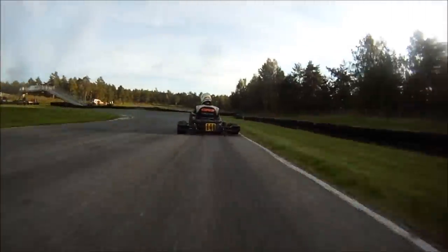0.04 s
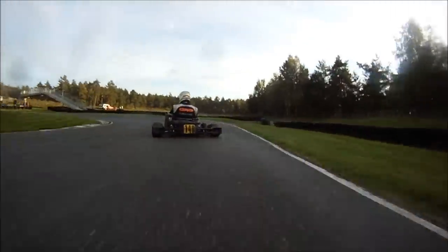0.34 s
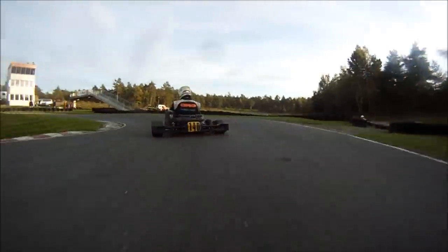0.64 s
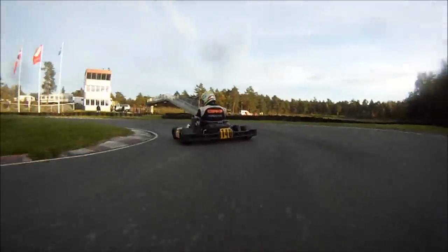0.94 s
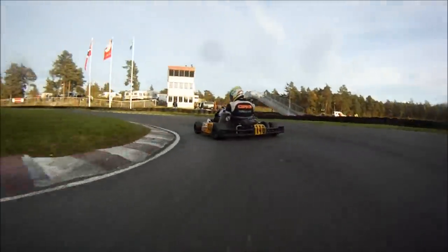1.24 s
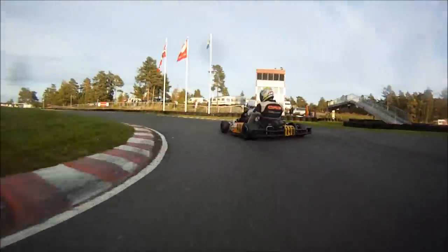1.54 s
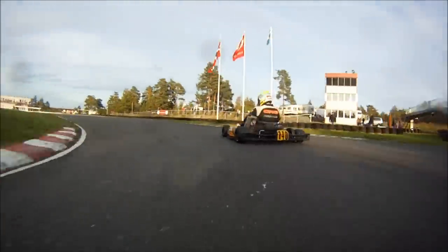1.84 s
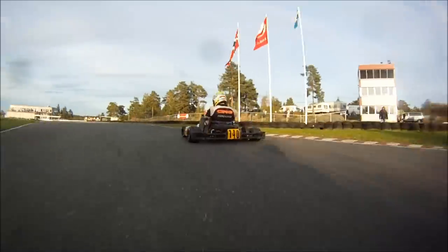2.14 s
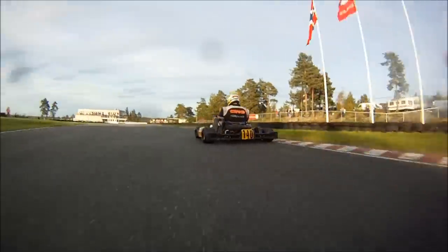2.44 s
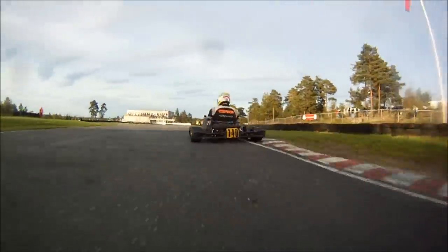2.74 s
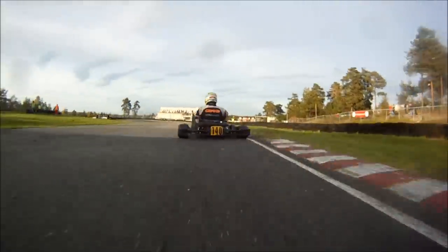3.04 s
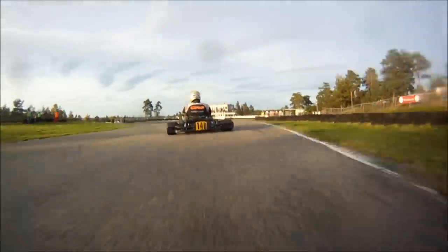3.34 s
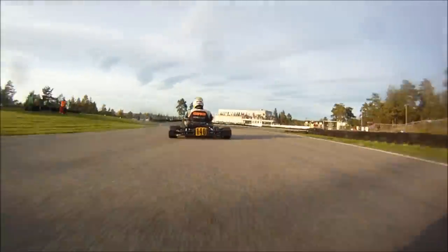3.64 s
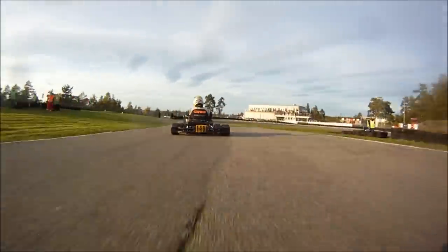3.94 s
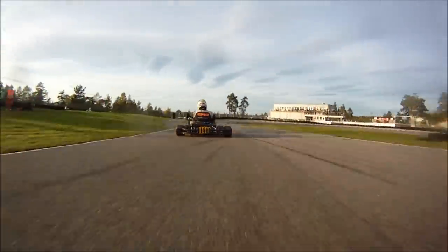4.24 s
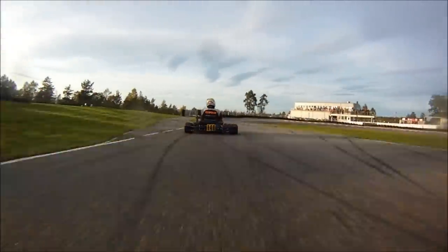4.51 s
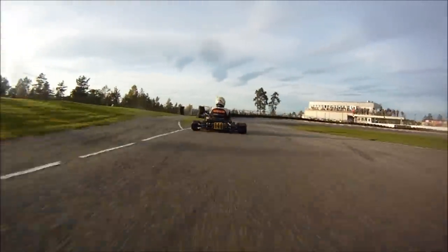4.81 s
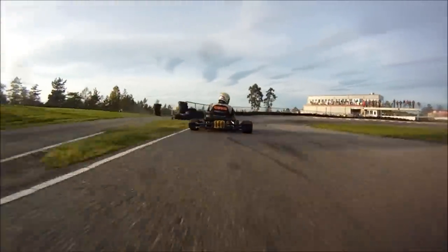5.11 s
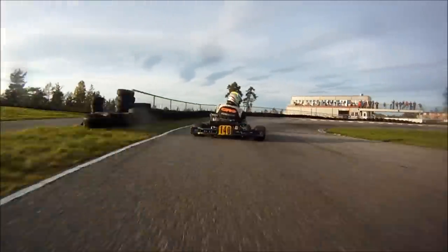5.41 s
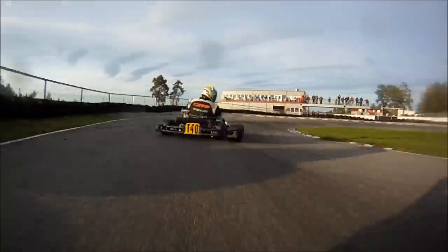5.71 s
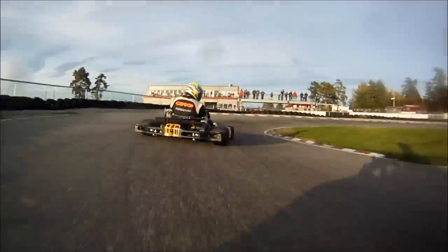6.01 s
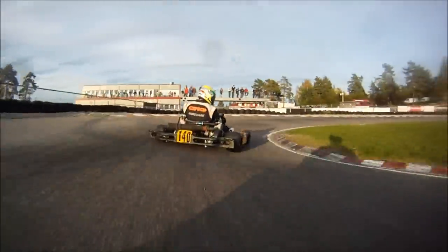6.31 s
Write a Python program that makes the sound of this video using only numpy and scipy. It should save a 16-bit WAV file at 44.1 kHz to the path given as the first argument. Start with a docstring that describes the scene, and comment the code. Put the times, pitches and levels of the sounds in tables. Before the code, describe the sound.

A small two-stroke kart races around a track, heard from a microphone mounted on it. The raspy engine sags into a bend, climbs with a brief flare of revs, screams up to a peak, then falls sharply for the next corner. Throughout, the microphone's housing chatters and clacks over bumps, low wind rumbles underneath, and a thin metallic fizz colours everything.

```python
"""A single-cylinder two-stroke kart on a track, heard from a small camera bolted to it.
Its revs sag into a bend, climb down the straight, flare over a kerb and fall for the next corner.
Each firing rings the exhaust and, under throttle, makes the intake bark. Vibration and bumps
rattle the camera housing while wind buffets it. The camera ducks after hard knocks and holds
its samples at a low rate, which adds a metallic fizz."""
import sys
import numpy as np
from scipy import signal
from scipy.fft import rfft, irfft, next_fast_len
from scipy.io import wavfile
from scipy.ndimage import uniform_filter1d

SR = 44100
rng = np.random.default_rng(int(sys.argv[2]) if len(sys.argv) > 2 else 0)


def persist_wave(psi):
    """Save psi, clipped to +-1, as 16-bit WAV."""
    counts = np.round(np.clip(psi, -1, 1) * 32767).astype(np.int16)
    wavfile.write(sys.argv[1], SR, np.atleast_2d(counts).T)


N = 284886
TIME = np.arange(N) / SR


def from_db(db):
    """Decibels to gain."""
    return 10 ** (np.asarray(db) / 20)


def rms_one(x):
    """Scale to unit power."""
    return x / np.sqrt(np.mean(x ** 2) + 1e-20)


def evened(x, size=4001):
    """Hold the short-term power at one."""
    return x / np.sqrt(np.abs(uniform_filter1d(x * x, size)) + 1e-12)


def in_time(rows):
    """Automation curve through (t/s, value) points."""
    return np.interp(TIME, *np.transpose(rows))


def drift(per_s):
    """Random modulation of unit power, with per_s new values a second."""
    return rms_one(np.interp(TIME * per_s, np.arange(N // 16), rng.standard_normal(N // 16)))


def colour(x, points):
    """Minimum-phase EQ through (f/Hz, level/dB) points."""
    size = 2 * next_fast_len(N // 2 + 4096)
    hz, db = np.transpose(points)
    bin_hz = np.arange(size // 2 + 1) * SR / size
    gain = from_db(np.interp(np.log(bin_hz + 1), np.log(hz), db))
    cepstrum = irfft(np.log(gain))
    cepstrum[1:size // 2] *= 2
    cepstrum[size // 2 + 1:] = 0
    return irfft(rfft(x, size) * np.exp(rfft(cepstrum)))[:N]


def resonance(x, hz, width_hz):
    """Two-pole resonance with unity gain at its peak."""
    r = np.exp(-np.pi * width_hz / SR)
    feedback = [1, -2 * r * np.cos(2 * np.pi * hz / SR), r * r]
    return signal.lfilter(np.array([1, 0, -1]) * (1 - r * r) / 2, feedback, x)


def resonances(x, modes):
    """Parallel resonances with alternating polarity."""
    return sum((-1) ** k * from_db(db) * resonance(x, hz, width) for k, (hz, width, db) in enumerate(modes))


def firings(turns, uneven, jitter_ms):
    """One click a revolution, each with its own strength and a slightly loose timing."""
    count = int(turns[-1])
    strength, slip = rng.standard_normal((2000, 2))[:count].T
    at = np.interp(np.arange(count) + .5, turns, np.arange(N)) + slip * jitter_ms * SR / 1000
    at = np.clip(np.round(at), 0, N - 1).astype(int)
    return np.bincount(at, np.maximum(1 + uneven * strength, 0), N)


def thump(turns, firing_hz, throttle):
    """Each revolution shakes the frame, hardest when the firing rate meets its resonance."""
    frame_hz, frame_width_hz = 149.4, 18
    boost_db = 8.5 / (1 + (2 * (firing_hz - frame_hz) / frame_width_hz) ** 2)
    swing = np.sin(2 * np.pi * turns) + from_db(-20.5) * np.sin(4 * np.pi * turns)
    return swing * from_db(-29.5 - 4 * throttle + boost_db + 3.2 * drift(45))


def exhaust(turns, rev_octaves, throttle):
    """Gas pulses ring the pipe; its expansion chamber drones most at high revs with the throttle shut."""
    # tone of a pulse through pipe and housing: f/Hz, level/dB
    pipe_eq = [(300, -26), (560, -22.5), (700, -9), (760, 0), (820, 6.5), (900, 17.5), (970, 7),
               (1060, 8.5), (1180, -9), (1700, -8), (3000, -58.5)]
    # fader of the exhaust note: t/s, level/dB
    note_fader = [(0.0, -19), (0.25, -22), (0.4, -23.5), (0.5, -16), (0.94, -18), (1.14, -27),
                  (1.34, -21.5), (1.89, -22), (2.24, -28), (2.43, -18.5), (2.78, -28), (3.73, -20.5),
                  (4.07, -21.5), (4.87, -21), (5.02, -25), (5.52, -20.5), (5.96, -15), (6.46, -19)]
    # low resonances of the expansion chamber: f/Hz, width/Hz, level/dB
    chamber_modes = [(265.6, 47, -7.5), (341.4, 63, 0.5), (450, 15, -14), (578, 62, -11.5),
                     (672, 9.1, -10.5)]
    blowdown = firings(turns, uneven=.1, jitter_ms=.012)
    note = evened(colour(blowdown, pipe_eq)) * from_db(in_time(note_fader) + .91 * drift(25))
    drone_db = -34 + 17.4 * rev_octaves - 14 * throttle + 3.2 * drift(20)
    return note + rms_one(resonances(blowdown, chamber_modes)) * from_db(drone_db)


def intake(turns, throttle):
    """Gulps of air sound the airbox: a hum with the throttle shut, a louder bark as it opens."""
    # tone of a pulse through the airbox, throttle open: f/Hz, level/dB
    bark_eq = [(600, -39), (880, -9), (1040, 3.5), (1150, 0.5), (1260, 4.5), (1350, -1.5), (1460, 14),
               (1580, 4), (1680, 3.5), (1950, -6.5), (2350, -16), (2560, 2), (2750, -16), (3100, -21.5),
               (3400, -42), (3750, -16), (4400, -30.5)]
    # bands of the bark that swell and fade on their own: f/Hz, width/Hz
    wavering_bands = [(1050, 54), (1450, 67), (1700, 24)]
    # airbox resonances, throttle shut: f/Hz, width/Hz, level/dB
    airbox_modes = [(1315, 10, 0.5), (1478, 16.5, 16.5), (1893, 18, -50.5), (2400, 27, -87)]
    # intake fader, ahead of trim and throttle gain: t/s, level/dB
    intake_fader = [(0.0, -23.5), (0.45, -25.5), (0.89, -22), (1.19, -22), (1.34, -17.5), (2.43, -16.5),
                    (2.78, -16.5), (2.88, -16.5), (3.83, -17.5), (3.98, -19.5), (4.42, -14.5),
                    (5.57, -29.5), (6.06, -20.5), (6.26, -33), (6.46, -25)]
    gulps = firings(turns, uneven=.16, jitter_ms=.014)
    bark = colour(gulps, bark_eq)
    waver = sum(drift(16) * resonance(bark, hz, width) for hz, width in wavering_bands)
    bark = evened(bark + waver)
    bark = bark - 2 * resonance(bark, hz=1924, width_hz=630)   # the airbox delays this band, rounding pulses
    hum = evened(resonances(gulps, airbox_modes))
    level_db = in_time(intake_fader) - 3.5 + 5 * throttle + .83 * drift(30)
    return evened(throttle * bark + (1 - throttle) * hum) * from_db(level_db)


def rasp(turns, throttle):
    """Gas rushes out just after the port opens and dies away within the revolution."""
    # tone of the gas noise: f/Hz, level/dB
    gas_eq = [(100, -35), (250, -22), (550, -25.5), (750, -35), (1000, 7.5), (1250, -3), (1500, 2),
              (1900, 5.5), (2500, -35), (2800, -9), (3700, -27.5), (4400, -26), (5500, -49)]
    puffs = rng.standard_normal(N) * np.exp(-((turns - .5) % 1) / .3)
    return rms_one(colour(puffs, gas_eq)) * from_db(-23 + 1.2 * throttle)


def honk(turns, rev_octaves, throttle):
    """Under load each firing sets off a rounded burst a few milliseconds long, strongest at low revs."""
    hz, width_hz = 1560, 208
    pulses = firings(turns, uneven=.25, jitter_ms=.025)
    bursts = evened(resonance(resonance(pulses, hz, width_hz), hz, width_hz))
    return bursts * throttle ** 2 * from_db(-22.5 - 24 * rev_octaves + 2 * drift(27))


def housing_ring(shake):
    """The camera housing rings with whatever shakes it."""
    # body tone of the housing: f/Hz, level/dB
    housing_eq = [(90, -24.5), (220, -10.5), (650, -17.5), (950, -6), (1300, -1.5), (1650, -7.5),
                  (2000, -8.5), (2200, -3), (2500, -8.5), (2780, -33), (3020, -9.5), (3380, -19.5),
                  (3750, -11.5), (4300, -32.5), (5200, -32.5)]
    return colour(shake, housing_eq)


def chatter(throttle):
    """Vibration keeps the housing chattering: small contacts that scuff briefly, over a fine buzz."""
    contacts_per_s, scuff_s = 260, .0015
    chance, side, softness = rng.random((3, N))
    contacts = (chance < contacts_per_s / SR) * np.sign(side - .5) * from_db(-7 * softness)
    scuff_decay = np.exp(-TIME[:600] / scuff_s)
    scuffs = signal.lfilter(scuff_decay, [1], np.abs(contacts)) * rng.standard_normal(N)
    shake = rms_one(contacts) * from_db(-8.5) + rms_one(scuffs) * from_db(-6.5)
    shake += rng.standard_normal(N) * from_db(1)
    buzz = rms_one(housing_ring(shake)) * from_db(-2.5 + .61 * drift(40))
    # on rough patches the loose housing rings at its own pitch
    ring = resonance(resonance(scuffs, hz=1770, width_hz=430), hz=1940, width_hz=880)
    flurries = rms_one(ring * from_db(1.6 * np.tanh(drift(50))))
    # an engine that pulls shakes the frame less than one that coasts
    return (buzz + from_db(-7) * flurries) * from_db(-16 - 3 * throttle)


def rumble():
    """Wind and road noise, swelling into a dull thud as the wheels run onto the kerb."""
    # tone of wind and road: f/Hz, level/dB
    wind_eq = [(12, 4), (25, -6), (37, -1), (52, -3.5), (80, -5.5), (110, -7.5), (170, -1.5), (250, -24.5),
               (400, -16.5), (700, -24.5), (2000, -52)]
    # rumble fader, ahead of trim: t/s, level/dB
    wind_fader = [(0.0, -28), (0.15, -24.5), (0.65, -35), (0.75, -30), (1.29, -26.5), (1.64, -35),
                  (2.09, -32), (2.39, -37), (3.58, -32), (4.07, -47), (4.22, -36), (4.67, -42),
                  (5.22, -28.5), (5.37, -29), (6.46, -25.5)]
    kerb_s, thud_width_s = 3.065, .029
    bed = from_db(in_time(wind_fader) + 5 + 1.66 * drift(25))
    thud = from_db(-16.5) * np.exp(-((TIME - kerb_s) / thud_width_s) ** 2)
    return rms_one(colour(rng.standard_normal(N), wind_eq)) * (bed + thud)


def jolts(throttle):
    """Small random bumps in the asphalt, fewer while the engine pulls, as rows for knocks()."""
    per_s = 22 * (1 - .3 * throttle)
    chance, size = rng.random(N), rng.standard_normal(N)
    return [(TIME[i], -7.5 + size[i], -42) for i in np.flatnonzero(chance < per_s / SR)]


def knocks(throttle):
    """Bumps knock the camera in its housing: a rough crack and a pitched clack that die at once."""
    # hard bumps, ahead of the clack and crack trims: t/s, level/dB, crack offset/dB
    hard_bumps = [(0.0775, -4.5, -21), (0.1441, -6.5, -26), (0.2309, -13, -39), (0.2573, -5, -23.5),
                  (0.3496, -4, -27), (0.4085, -1, -32), (0.4868, -2, -26), (0.5826, -3, -24),
                  (0.8387, -5.5, -29), (0.9628, -3.5, -28.5), (1.0592, -0.5, -22), (1.1134, 2.5, -26.5),
                  (1.2426, -10, -27), (1.4737, -4.5, -36), (2.1426, 1, -53), (2.7041, -2.5, -33),
                  (3.0335, -1.5, -28.5), (3.6622, -5.5, -32), (3.9044, -2, -35), (4.0043, -3, -31),
                  (4.3016, -5, -30), (5.0145, 3, -33.5), (5.0365, -2.5, -41), (5.1203, -6.5, -27),
                  (5.1805, -6, -32), (5.329, -3.5, -23.5), (5.3732, -6.5, -25.5), (5.4337, -2.5, -29),
                  (5.5231, 1, -24.5), (6.1907, -0.5, -36.5), (6.2262, -2.5, -24.5), (6.367, 0, -50)]
    clack_hz, spread_hz, rise_s = 2036, 100, .0012
    clack_trim_db, crack_trim_db = 2, 35.5
    bumps = list(hard_bumps) + jolts(throttle)
    age = TIME[:900]
    swell = age / rise_s
    envelope = swell ** 1.5 * np.exp(1.5 * (1 - swell))
    clacks, cracks = np.zeros((2, N + len(age)))
    grit, detune = rng.standard_normal((2, N))
    for (s, db, crack_db), hz in zip(bumps, clack_hz + spread_hz * detune):
        at = int(s * SR)
        clacks[at:at + len(age)] += from_db(db + clack_trim_db) * envelope * np.sin(2 * np.pi * hz * age)
        cracks[at:at + len(age)] += from_db(db + crack_db + crack_trim_db) * envelope
    cracks = cracks[:N] * grit
    bite = from_db(-14.5) * resonance(cracks, hz=2600, width_hz=1800)
    return clacks[:N] + housing_ring(cracks) + bite


def scene():
    """Engine, housing and wind in mono at the camera; revs and throttle drive the engine's layers."""
    # firing rate; sags into the bend, climbs, flares over the kerb, falls under braking: t/s, f/Hz
    revs = [(0.0, 167.8), (0.38, 164.3), (0.47, 155.5), (0.54, 159.0), (0.65, 142.6), (0.88, 136.1),
            (0.92, 138.9), (1.22, 142.6), (1.33, 147.6), (1.4, 145.1), (1.56, 145.1), (1.6, 148.1),
            (1.78, 150.6), (1.87, 143.5), (1.96, 146.4), (2.09, 138.7), (2.28, 138.9), (2.48, 150.8),
            (2.93, 162.0), (2.98, 167.5), (3.17, 164.9), (3.24, 192.4), (3.26, 191.4), (3.29, 173.0),
            (3.31, 166.9), (3.38, 181.1), (3.47, 176.8), (3.52, 186.2), (3.56, 179.9), (3.69, 187.4),
            (3.74, 194.8), (3.8, 188.5), (3.87, 195.8), (4.35, 209.1), (4.91, 223.2), (4.97, 219.6),
            (5.07, 202.0), (5.13, 198.5), (5.16, 186.2), (5.24, 192.9), (5.29, 184.6), (5.34, 188.2),
            (5.5, 160.0), (5.59, 158.4), (5.65, 151.8), (5.76, 145.5), (5.85, 152.1), (6.06, 150.1),
            (6.39, 132.8), (6.46, 137.2)]
    # the driver's foot: t/s, throttle/0-1
    pedal = [(0, 0.45), (.95, 0.93), (1.18, 0.37), (1.33, 0.98), (4.9, 0.88), (5.05, 0.2), (5.55, 0.69),
             (5.9, 0.5), (6.46, 0)]
    firing_hz = in_time(revs) * (1 + .0015 * drift(40))
    throttle = in_time(pedal)
    turns = np.cumsum(firing_hz) / SR
    rev_octaves = np.log2(firing_hz / firing_hz.min())
    engine = thump(turns, firing_hz, throttle) + exhaust(turns, rev_octaves, throttle)
    engine += intake(turns, throttle) + rasp(turns, throttle) + honk(turns, rev_octaves, throttle)
    housing = chatter(throttle) + knocks(throttle)
    return (engine + housing + rumble())[None]


def gain_control(x, ceiling_db, attack_s, release_db_per_s):
    """Peaks above the ceiling duck the gain quickly; it creeps back."""
    over_db = np.maximum(20 * np.log10(np.abs(x) + 1e-9) - ceiling_db, 0)
    held_db = np.maximum.accumulate(over_db + release_db_per_s * TIME) - release_db_per_s * TIME
    r = np.exp(-1 / (attack_s * SR))
    return x * from_db(-signal.lfilter([1 - r], [1, -r], held_db))


def record(dry):
    """The camera ducks, clips and samples slowly; its held steps mirror the sound into the treble."""
    camera_hz, hold_count, top_hz = 12000, 4, 15400
    coupled = signal.sosfilt(signal.butter(1, 12, "high", fs=SR, output="sos"), dry[0])
    ducked = gain_control(coupled, ceiling_db=-2, attack_s=.00077, release_db_per_s=42)
    samples = signal.resample_poly(ducked, camera_hz, SR)
    samples = signal.sosfilt(signal.butter(2, 5500, fs=camera_hz, output="sos"), samples)
    clipped = np.clip(samples, -.94, .94)
    steps = signal.resample_poly(np.repeat(clipped, hold_count), SR, camera_hz * hold_count)[:N]
    top_cut = signal.firwin(255, top_hz, fs=SR, window="blackman")
    return signal.fftconvolve(steps, top_cut, "same")[None]


dry = scene()
out = record(dry)
persist_wave(out)
```